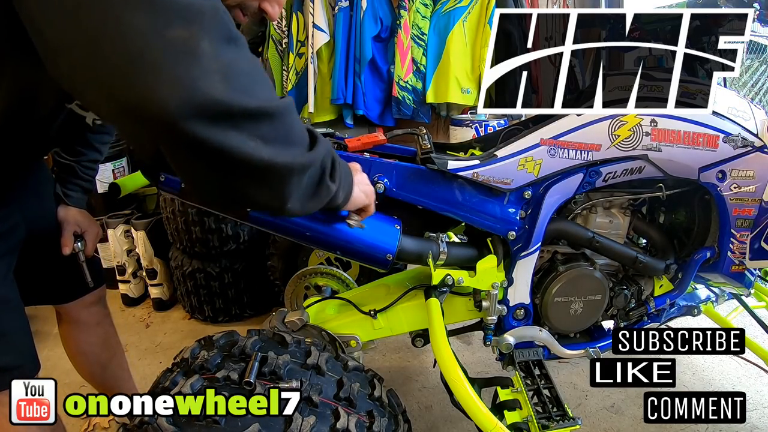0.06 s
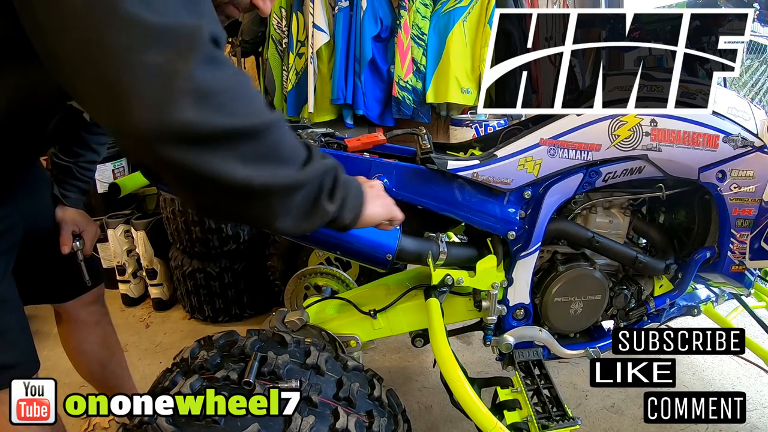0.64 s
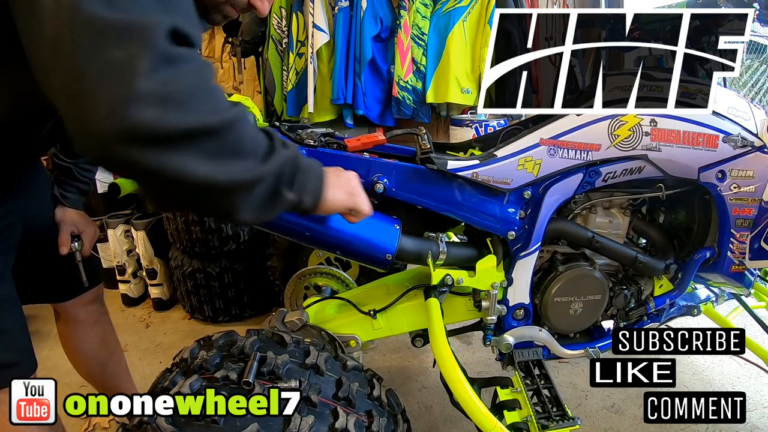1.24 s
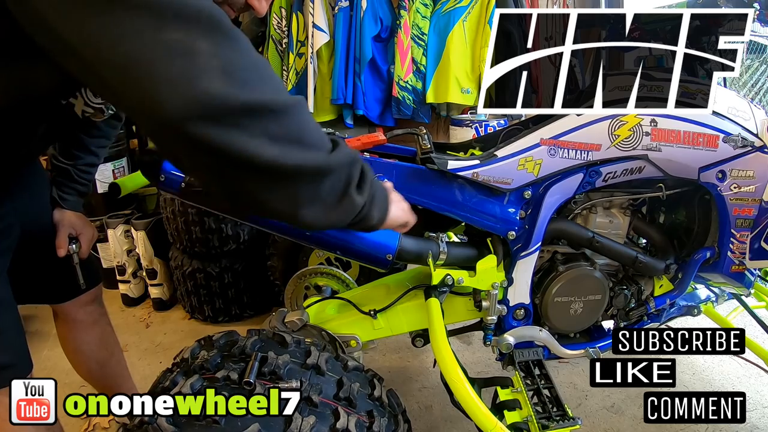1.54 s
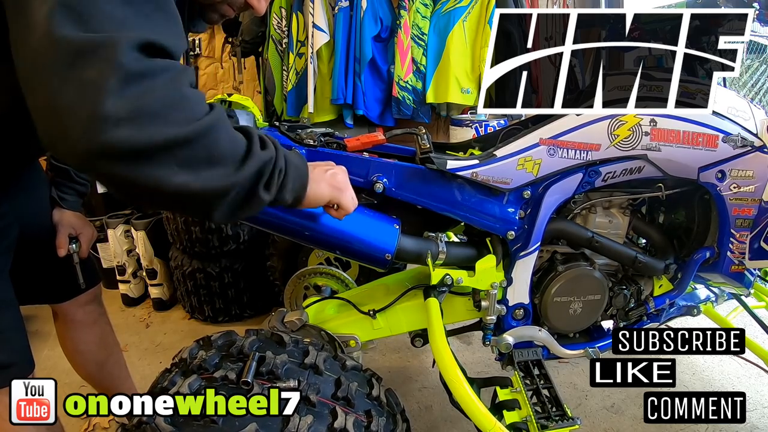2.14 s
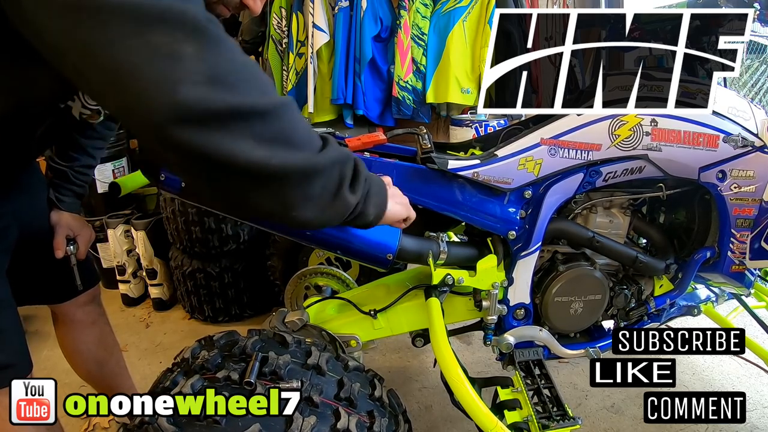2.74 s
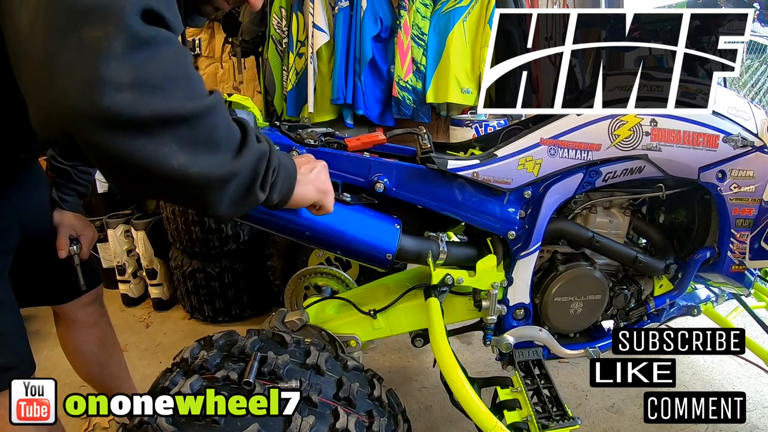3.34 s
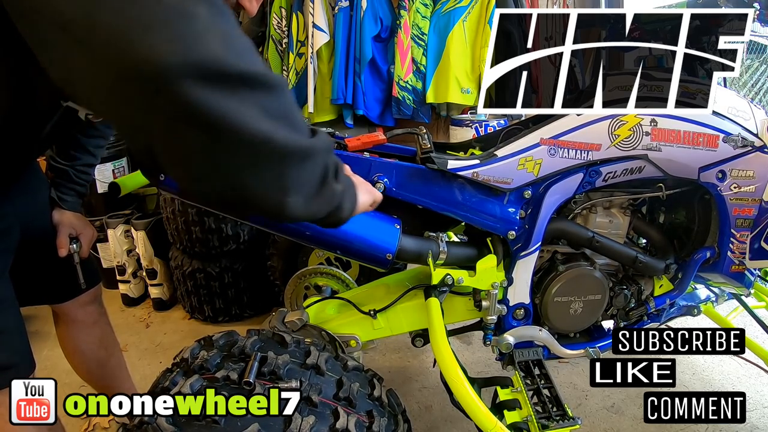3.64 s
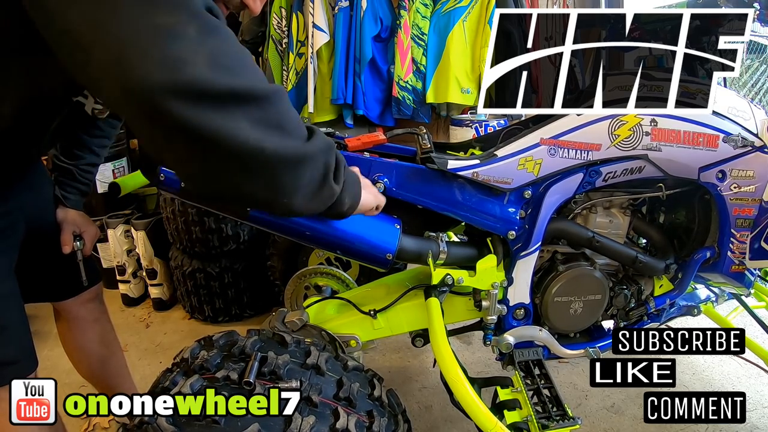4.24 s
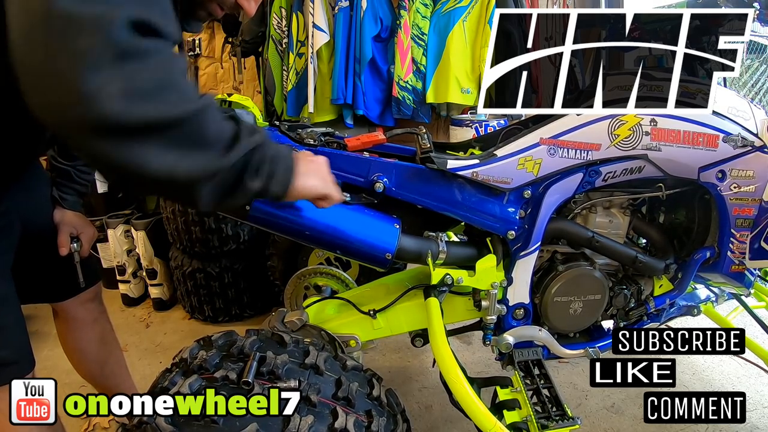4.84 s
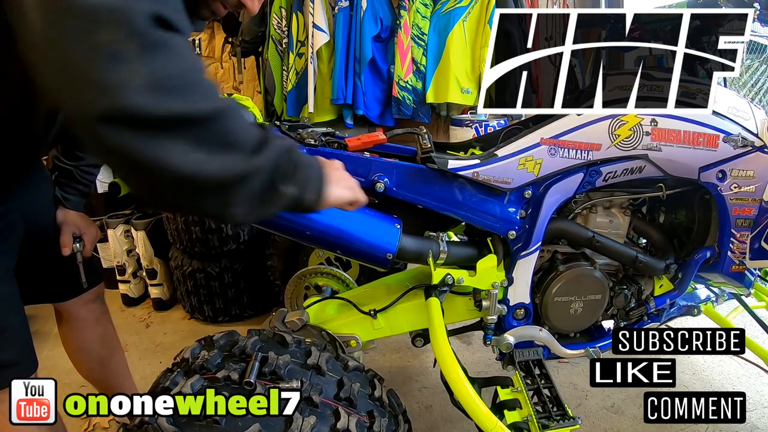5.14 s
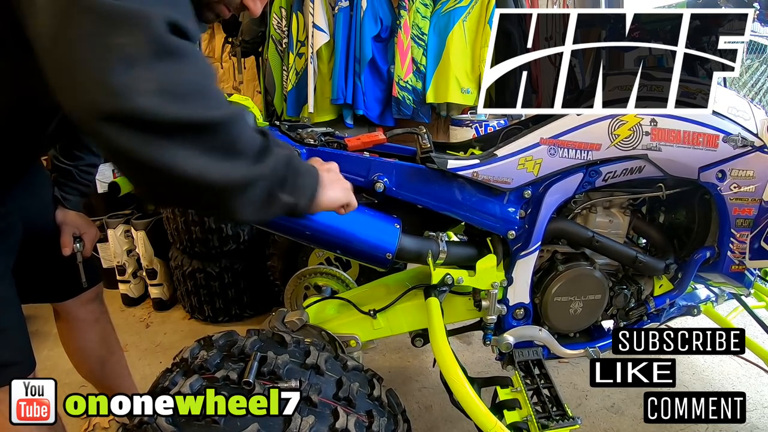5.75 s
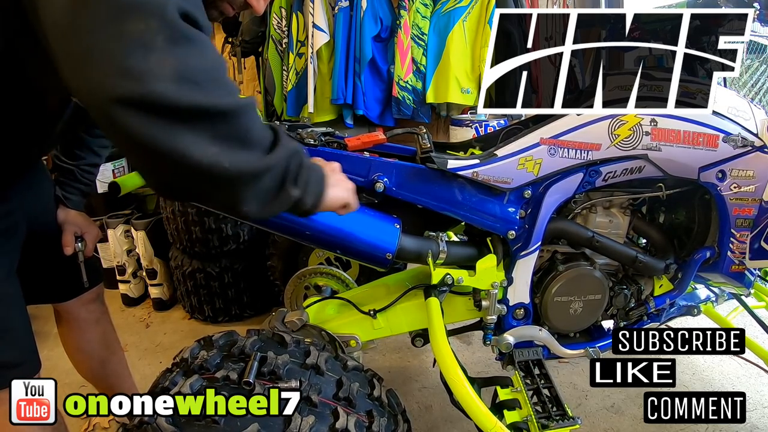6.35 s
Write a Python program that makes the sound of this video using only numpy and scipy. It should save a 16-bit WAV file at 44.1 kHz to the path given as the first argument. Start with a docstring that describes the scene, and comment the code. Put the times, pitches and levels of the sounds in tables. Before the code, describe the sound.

A socket ratchet tightens bolts on a quad bike exhaust in a small garage. Each swing gives a quick burst of crisp clicks, usually followed by a light metal knock, about twice a second. Just past halfway the ratcheting pauses for a few sharper, louder steel clacks and a soft thud, then five more swings follow. The hits ring briefly with a short room echo, over faint hiss and low hum.

```python
"""A socket ratchet tightens bolts on the exhaust of a quad bike in a small garage.
Soft hiss and low hum are present from the start. On each back swing the loose socket first rocks through
its play, then the pawl skips over the gear teeth; after that the socket knocks as it takes up the load.
Each impact sets tool and exhaust ringing briefly, and bodywork and garage reflect the sound.
A few hard pulls shake the frame. The loudest blows fall just past halfway; five more swings follow."""
import sys
import numpy as np
from scipy import signal
from scipy.fft import rfft, irfft, next_fast_len
from scipy.io import wavfile

SR = 44100
rng = np.random.default_rng(int(sys.argv[2]) if len(sys.argv) > 2 else 0)


def transcribe(u):
    """Save the signal u as a 16-bit wav file named by the first command-line argument.

    u: samples, shape (n,) or (channels, n), limited to [-1, 1]; the rate is SR.
    q: integer samples, one column per channel.
    """
    v = np.clip(np.atleast_2d(u).T, -1, 1)
    q = np.round(v * 32767).astype(np.int16)
    wavfile.write(sys.argv[1], SR, q)


N = 281693

# Noise spectrum of still air and microphone: f/Hz, relative density/dB
HISS_SPECTRUM = [(12, -48), (20, -26), (70, -5.5), (130, -7), (167, -3.5), (220, -8), (246, -13),
                 (430, -18), (772, -13.5), (939, -14.5), (1390, -14.5), (3200, -18.5), (5920, -14),
                 (12200, -34), (15700, -50)]
# Left-right coherence of diffuse sound: f/Hz, coherence (0-1)
COHERENCE = [(100, 0.99), (1000, 0.76), (3000, 0.83), (4800, 0.94), (6000, 0.27), (7500, 0), (15000, 0.45)]
# Imbalance of the microphone ports, for the hiss and for the impacts: f/Hz, left minus right/dB
HISS_BALANCE = [(60, 1), (110, -1.5), (200, -1), (380, 1.5), (700, -5.5), (1290, -6.5), (2380, -2),
                (4400, -5), (8120, -8), (15000, 2)]
IMPACT_BALANCE = [(100, 0.5), (700, -1.5), (1200, -4), (2000, -1), (3000, -0.1), (4200, -1.5), (5200, -4.5),
                  (6000, -11), (7000, -5.5), (8500, -1.5), (10000, 0), (14000, -0.5)]
# Bands of room hum: f/Hz, bandwidth/Hz, rms level before swelling/dB
HUM_BANDS = [(62, 1.2, -72), (164, 22, -69), (229, 41, -71)]
# Single pawl drops outside the swings: t/s, relative level/dB, body/dB, brightness/dB, top treble/dB
PAWL_DROPS = [(.0023, -31.5, -2, 5, 0.5), (.0223, -35, 0, 8, -7), (.2794, -24, -4, 2, -3),
              (1.9017, -29, -12, -0.5, -8), (3.6785, -19, 5, 18.5, 4), (3.7355, -29, 0, 16, 3),
              (3.8027, -28, 6, 5.5, 5), (4.176, -32.5, 2.5, 6, -9.5), (5.9929, -37.5, -15, 4, 0),
              (6.0245, -38, -10, 0.5, -1)]
# Contact spectra of pawl and socket: f/Hz, relative density/dB
PAWL_SPECTRUM = [(150, -28.5), (600, -25), (1200, -10.5), (1900, -2), (2450, -5.5), (3150, -0.5),
                 (3650, 0.5), (4150, -3), (4900, 2), (5900, 2.5), (7600, -10), (10300, -8.5),
                 (13000, -19.5), (15500, -36.5)]
SOCKET_SPECTRUM = [(100, -28), (260, -12), (400, -12.5), (650, -8), (900, -6.5), (1300, 6.5), (2400, 2),
                   (3100, 5), (4000, -0.5), (4900, 4.5), (6200, 0), (8000, -26.5), (10500, -26),
                   (15000, -49)]
# Normal modes of tool and exhaust: f/Hz, bandwidth/Hz, gain/dB
STEEL_MODES = [(283, 16, 7), (474, 18, 3), (654, 30, 13), (1846, 26, 4), (2695, 22, -8), (2864, 24, -4),
               (3169, 55, -4), (3640, 70, -7), (4626, 30, -8), (5390, 16, -6), (6061, 22, -7),
               (6241, 24, -2), (6392, 20, -7), (7492, 18, -2), (10528, 16, -1)]
# Reverberation of the garage: f/Hz, base T60/s, relative level/dB
GARAGE_DECAY = [(197, 0.66, 0), (690, 0.16, 12), (2200, 0.28, -3.5), (4800, 0.26, -1.5), (8150, 0.26, 5.5),
                (15800, 0.24, 4)]
# Two knocks of the loose socket as a swing begins:
# share of slack left (0-1), level offset/dB, body/dB, brightness/dB, top treble/dB, thud/dB
SLACK_KNOCKS = [(1, -2.5, 0.5, -7, 4, 2), (.5, -3.5, 6.5, 1.5, -4, 3)]
# Back swings: first tooth t/s, last tooth t/s, tooth count, share of swing done at first and at last
# tooth (0-1), relative level/dB, first accent/dB, last accent/dB, body/dB, brightness/dB, top treble/dB,
# slack duration/s, relative slack level/dB
BACK_SWINGS = [(.1602, .245, 6, 0.12, 0.94, -21.5, -0.5, -3.5, -4.5, -0.5, -2.5, 0.049, -46),
               (1.0139, 1.1124, 7, 0.32, 0.98, -22.5, -8, 0.5, 3, 1.5, -4.5, .011, -35.5),
               (1.5027, 1.583, 6, 0.16, 0.88, -21.5, -12.5, 0, -3, 0.5, -4.5, 0.035, -46.5),
               (1.9468, 2.0233, 6, 0.4, 0.9, -21.5, -0.5, -1, -6, 1, -2.5, 0.051, -44),
               (2.3428, 2.4169, 6, 0.28, .797, -23, -7, 3.5, -4, -1.5, -3, 0.031, -41),
               (2.7544, 2.8326, 6, 0.14, 0.96, -23, 1, 0.5, -1, 0, -2, 0.047, -39.5),
               (4.2157, 4.3016, 8, 0.13, 0.9, -23.5, 0, 3, 3.5, 9, -1.5, .039, -37.5),
               (4.7131, 4.8012, 7, .316, .936, -23.5, 2, 1.5, 1, 4, -3.5, .043, -32),
               (5.1884, 5.2718, 7, 0.4, 0.91, -26, 4.5, -2.5, 3, 0, -0.5, 0.042, -38),
               (5.6682, 5.7542, 6, 0.02, 0.98, -25, 3.5, 0, 5, 1, -2, 0.039, -34),
               (6.2986, 6.384, 6, 0.36, 0.93, -25.5, 0, -2, 10, 6, 0, .05, -39.5)]
# The socket takes up the load or is reseated:
# t/s, relative level/dB, body/dB, brightness/dB, top treble/dB, thud/dB
LOAD_KNOCKS = [(.2505, -36.5, 12, 8, -3, 2), (.372, -32, .5, .5, 2, -0.5), (1.1938, -34.5, 1.5, 0, 1, -3.5),
               (1.6589, -36, 3, -4, -4, 2), (1.6642, -30, -5.5, -4.5, -4, 5.5),
               (2.0863, -18, -2.5, -1, 3, -4.5), (2.4829, -28, 0, -3, -7, -1),
               (2.8991, -21, -6.5, -6, -1, 2), (3.161, -32.5, -6.5, -3, 3, -2.5),
               (3.421, -17.5, 5.5, 11.5, 22.5, 4.5), (3.5036, -26.5, -1.5, 1, 4, 5.5),
               (3.5446, -30, -6, 6.5, 11, 3), (3.6688, -23, -19.5, -15, 15, 4.5),
               (3.675, -15, 2.5, 12.5, 18, -5.5), (3.7524, -29.5, -4.5, 6.5, 10, 0.5),
               (3.8709, -32.5, -5.5, -5, -1, 5.5), (4.3175, -27.5, -2, 1.5, -2, 2.5),
               (4.3551, -34.5, 0.5, -4, 2, 4), (4.3913, -27.5, -8, -11.5, -1, -1.5),
               (4.8675, -39.5, 2, -14, -4, 8), (4.8789, -33, -2, 1, 3, 7),
               (5.3482, -30.5, 0.5, -5.5, -1, 4.5), (5.8275, -29, -4.5, -2, -5, 10.5),
               (6.3822, -22, -2, -8, 3, 6)]
# Shakes of the frame under hard pulls: t/s, f/Hz, level/dB, time constant/s
FRAME_SHAKES = [(.385, 62, -50.5, 0.03), (3.683, 270, -40, 0.012), (4.412, 105, -50.5, 0.021),
                (6.33, 77, -67, 0.023)]
# Reach of the tone controls body, brightness, top treble and thud: f/Hz, weight (0-1)
TONE_BANDS = [[(300, .3), (800, 1), (1800, 1), (2700, 0)],
              [(3900, 0), (5000, 1), (6800, 1), (9000, .4)],
              [(6500, 0), (8500, 1)],
              [(300, 0), (450, 1), (700, 1), (950, 0)]]

SKIM_DB = -3  # at full speed the pawl has less time to drop, so it clicks more softly
TOOTH_SCATTER_DB, TONE_SCATTER_DB = 1.2, 2.5  # no two teeth are alike
DULL_DB_PER_DB = 1.8  # a half-caught first tooth is duller


def amp(db):
    """Amplitude grows tenfold for every 20 dB."""
    return 10 ** (np.asarray(db) / 20)


def unit_rms(x):
    """Normalisation to unit mean power."""
    return x / np.sqrt(np.mean(x ** 2) + 1e-20)


def curve(points, hz):
    """Interpolation on a logarithmic frequency axis."""
    f, value = np.transpose(points)
    return np.interp(np.log(hz + 1), np.log(f + 1), value)


def bins(size):
    """Fourier analysis resolves frequencies SR / size apart."""
    return np.fft.rfftfreq(size, 1 / SR)


def add(mix, s, sound):
    """Superposition: a stereo sound joins the mix at time s."""
    start = round(s * SR)
    sound = sound[:, max(-start, 0):]
    part = mix[:, max(start, 0):][:, :sound.shape[1]]
    part += sound[:, :part.shape[1]]


def colour(x, db):
    """Minimum-phase filtering: a causal response with the given gain in each bin."""
    size = x.shape[-1]
    cepstrum = irfft(np.log(amp(db)), size)
    cepstrum[..., 1:size // 2] *= 2
    cepstrum[..., size // 2 + 1:] = 0
    return irfft(rfft(x) * np.exp(rfft(cepstrum)), size)


def diffuse_pair(x):
    """Partial coherence: two independent signals become alike in the bass, less so in the treble."""
    size = x.shape[-1]
    coherence = np.clip(curve(COHERENCE, bins(size)), 0, 1)
    mid, side = rfft(x) * np.sqrt([(1 + coherence) / 2, (1 - coherence) / 2])
    return irfft(np.array([mid + side, mid - side]), size)


def ports(x, balance):
    """Resonance colours each port differently; their summed power gain is constant."""
    size = next_fast_len(N + 4096, True)
    db = curve(balance, bins(size)) * np.array([[.5], [-.5]])
    db -= 10 * np.log10((amp(db) ** 2).mean(0))
    return colour(np.pad(x, ((0, 0), (0, size - N))), db)[:, :N]


def hiss_and_hum(hiss_db, swell_db):
    """Amplitude modulation: rumble and narrow bands of hum swell and sink beneath a steady hiss."""
    hz = bins(N)
    spectrum = rfft(rng.standard_normal((2, N))) * amp(curve(HISS_SPECTRUM, hz))
    hiss = amp(hiss_db) * unit_rms(ports(diffuse_pair(irfft(spectrum, N)), HISS_BALANCE))
    rumble = irfft(rfft(hiss) / (1 + (hz / 120) ** 4), N)
    hum = np.zeros(N)
    for f, width, db in HUM_BANDS:
        band = rfft(rng.standard_normal(N)) / (1 + (2 * (hz - f) / width) ** 2)
        hum += amp(db) * unit_rms(irfft(band, N))
    swell = unit_rms(irfft(rfft(rng.standard_normal(N)) * (hz > 0) * np.exp(-hz / 6), N))
    return hiss - rumble + (rumble + hum) * amp(swell_db * swell)


def impacts(rows, spectrum, gain_db, rise_s, fall_s, crack_db, crack_hz, rebound_db,
            rattle_db, rattle_s, scuff_db=-np.inf, scuff_s=1):
    """Brief contact gives a broad spectrum: steel cracks on steel, chatters, rebounds and rattles."""
    size, lead, attack = 4096, 1024, 180  # samples
    t, hz, out = (np.arange(size) - lead) / SR, bins(size), np.zeros((2, N))
    after = np.maximum(t, 0)
    onset = after ** 2 / (rise_s ** 2 + after ** 2)
    chatter = onset * np.exp(-after / fall_s)
    rattle = amp(rattle_db) * onset * np.exp(-after / rattle_s)
    slide = np.exp(-(t / scuff_s) ** 2)
    impulse = amp(crack_db) * np.linalg.norm(chatter) * (np.arange(size) == np.argmax(chatter))
    crack = irfft(rfft(impulse) / (1 + (hz / crack_hz) ** 4), size)  # the contact time rounds it off
    bands = [curve(band, hz) for band in TONE_BANDS]
    for s, db, *tone_db in rows:
        rebound = amp(rebound_db) * rng.random() * np.roll(chatter, int(SR * rng.uniform(.0022, .0073)))
        scuff = amp(scuff_db - db) * slide  # does not grow with the blow, so only soft ones sound scuffed
        envelope = np.sqrt(chatter ** 2 + rebound ** 2 + rattle ** 2 + scuff ** 2)
        noise = diffuse_pair(rng.standard_normal((2, size)) * envelope)
        tilt_db = sum(band * band_db for band, band_db in zip(bands, tone_db))
        hardness = amp(.5 * min(db + 14.5, 0))  # gentle blows hardly crack
        blow = colour(noise + hardness * crack, curve(spectrum, hz) + tilt_db)
        attack_rms = np.sqrt(np.mean(blow[:, lead:lead + attack] ** 2))
        add(out, s - lead / SR, amp(db + gain_db) * blow / attack_rms)
    return out


def pawl_clicks(drops):
    """Impact of a small mass: the pawl snaps cleanly onto the gear, too light to thud."""
    return impacts([(*drop, 0) for drop in drops], PAWL_SPECTRUM, gain_db=-.5,
                   rise_s=.0006, fall_s=.00136, crack_db=-11.5, crack_hz=7260,
                   rebound_db=-7, rattle_db=-12, rattle_s=.0073)


def steel_ring(blows):
    """Free vibration: each mode of tool and exhaust decays at a rate of pi times its bandwidth."""
    t = np.arange(SR // 3) / SR
    modes = np.zeros_like(t)
    for hz, width, db in STEEL_MODES:
        damping = np.pi * width
        modes += amp(db) * 2 * damping / SR * np.exp(-damping * t) * np.cos(2 * np.pi * hz * t)
    return signal.oaconvolve(blows, modes[None], axes=1)[:, :N]


def bending_waves(x, lag_s, corner_hz):
    """Dispersion: low bending waves travel slower in exhaust and frame, so each blow slides downwards."""
    size = next_fast_len(N + 8192, True)
    group_delay = lag_s * np.exp(-bins(size) / corner_hz)
    phase = 2 * np.pi * np.cumsum(group_delay) * SR / size
    return irfft(rfft(x, size) * np.exp(-1j * phase), size)[:, :N]


def echo_tails(build_s, t60_scale):
    """Reverberation: three sets of sparse reflections build up, then each band decays at its own rate."""
    size, echoes_per_s = SR // 2, 8000
    garage = np.array(GARAGE_DECAY)
    for taps in rng.standard_normal((3, 2, size)) * (rng.random((3, 1, size)) < echoes_per_s / SR):
        hz, t, spectra = signal.stft(diffuse_pair(taps), SR, nperseg=256)
        t60 = t60_scale * curve(garage[:, [0, 1]], hz)[:, None]
        db = curve(garage[:, [0, 2]], hz)[:, None]
        tail = signal.istft(spectra * amp(db - 60 * t / t60), SR, nperseg=256)[1]
        tail *= 1 - np.exp(-(np.arange(tail.shape[1]) / SR / build_s) ** 2)
        yield tail / np.sqrt((tail ** 2).sum() / 2)


def reflections(x, build_s, t60_scale, wet_db, drift_hz):
    """Multipath propagation: the moving arm alters the paths, so the sound drifts between echo sets."""
    turn, out = 2 * np.pi * drift_hz * np.arange(N) / SR, np.zeros((2, N))
    for k, tail in enumerate(echo_tails(build_s, t60_scale)):
        share = np.sqrt(2 / 3) * np.cos(turn + 2 * np.pi * k / 3)  # the squares sum to one
        out += signal.oaconvolve(x * share, tail, axes=1)[:, :N]
    return amp(wet_db) * out


def socket_knocks():
    """Backlash: the socket slides and strikes as it rocks through its play or takes up the load."""
    rocking = [(first_s - left * slack_s, slack_db + db, *tone)
               for first_s, *_, slack_s, slack_db in BACK_SWINGS for left, db, *tone in SLACK_KNOCKS]
    return impacts(LOAD_KNOCKS + rocking, SOCKET_SPECTRUM, gain_db=-2,
                   rise_s=.0007, fall_s=.00139, crack_db=-.5, crack_hz=6170,
                   rebound_db=-39, rattle_db=-12, rattle_s=.0043, scuff_db=-50.5, scuff_s=.0068)


def tooth_drops():
    """Harmonic motion: the hand swings past evenly spaced teeth, so the clicks crowd in mid swing."""
    drops = []
    for first_s, last_s, count, begin, end, db, first_db, last_db, *tone, _, _ in BACK_SWINGS:
        body_db, bright_db, top_db = tone
        phase = np.arccos(1 - 2 * np.linspace(begin, end, count))
        times = np.interp(phase, phase[[0, -1]], [first_s, last_s])
        levels = db + SKIM_DB * np.sin(phase)
        levels[[0, -1]] += first_db, last_db
        for k, (s, tooth_db) in enumerate(zip(times, levels)):
            loud, body, bright = rng.standard_normal(3)
            dull_db = DULL_DB_PER_DB * min(first_db, 0) * (k == 0)
            drops.append((s, tooth_db + TOOTH_SCATTER_DB * loud, body_db + TONE_SCATTER_DB * body,
                          bright_db + TONE_SCATTER_DB * bright + dull_db / 2, top_db + dull_db))
    return drops


def frame_thuds():
    """Damped oscillation: a hard pull shakes the frame in a low note that swells and quickly dies."""
    t, out = np.arange(SR // 3) / SR, np.zeros((2, N))
    for s, hz, db, decay_s in FRAME_SHAKES:
        envelope = amp(db) * t / decay_s * np.exp(1 - t / decay_s)
        note = envelope * np.sin(2 * np.pi * (hz * t + rng.random()))
        add(out, s, np.array([note, note]))
    return out


def scene():
    """Superposition: direct sound, its reflections and the thuds add to the hiss and hum."""
    blows = pawl_clicks(tooth_drops() + PAWL_DROPS) + socket_knocks()
    direct = bending_waves(blows + steel_ring(blows), lag_s=.033, corner_hz=329.7)
    bodywork = reflections(direct, build_s=.0027, t60_scale=.27, wet_db=-3, drift_hz=2.8)
    room = reflections(direct, build_s=.0071, t60_scale=.97, wet_db=-3, drift_hz=1.7)
    work = ports(direct + bodywork + room + frame_thuds(), IMPACT_BALANCE)
    return work + hiss_and_hum(hiss_db=-54, swell_db=4)


def record(dry):
    """Band limiting: a low-pass filter removes the highest treble."""
    lowpass = signal.firwin(255, cutoff=15400, window=("kaiser", 9), fs=SR)
    return signal.oaconvolve(dry, lowpass[None], "same")


dry = scene()
out = record(dry)
transcribe(out)
```